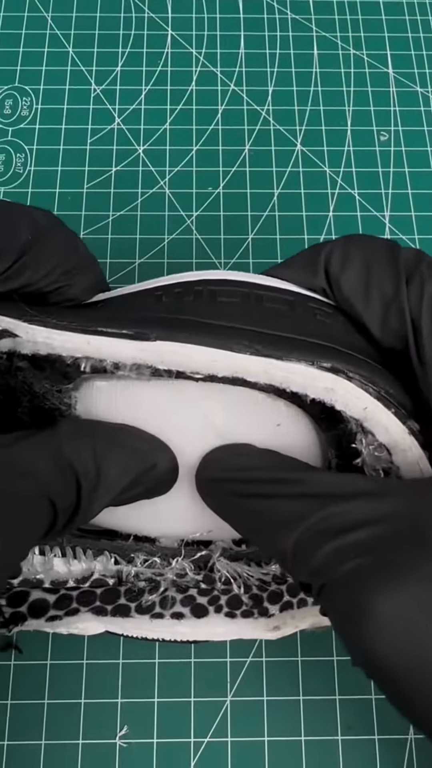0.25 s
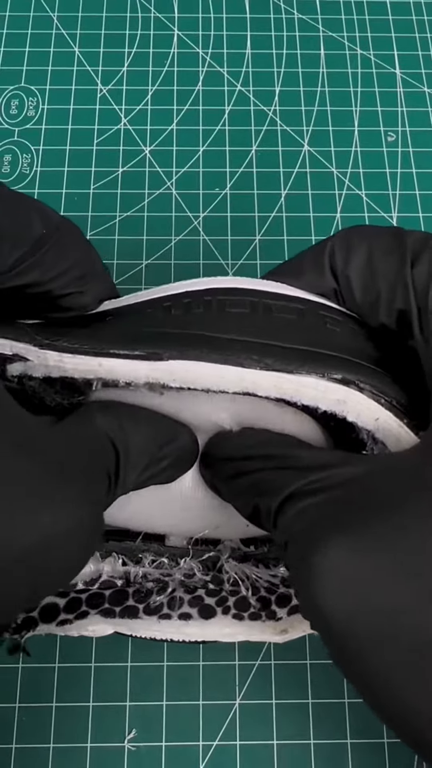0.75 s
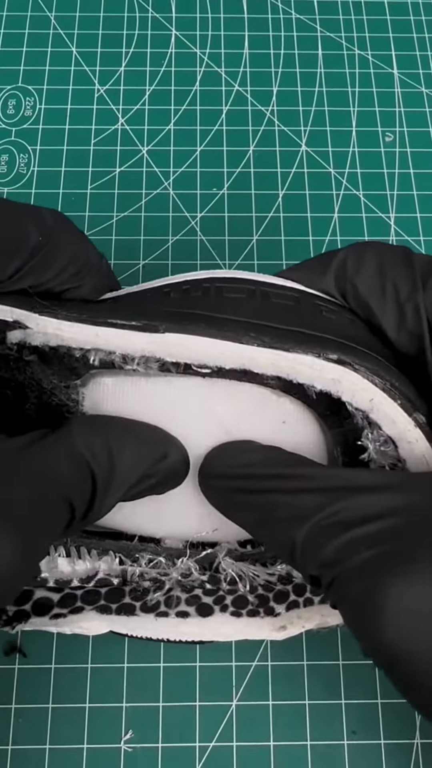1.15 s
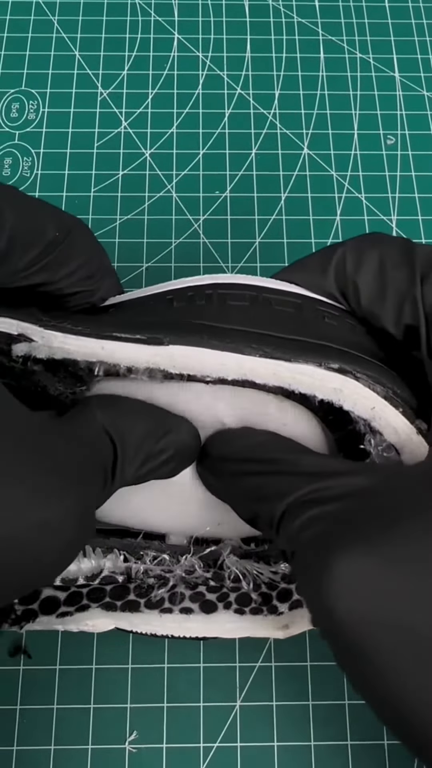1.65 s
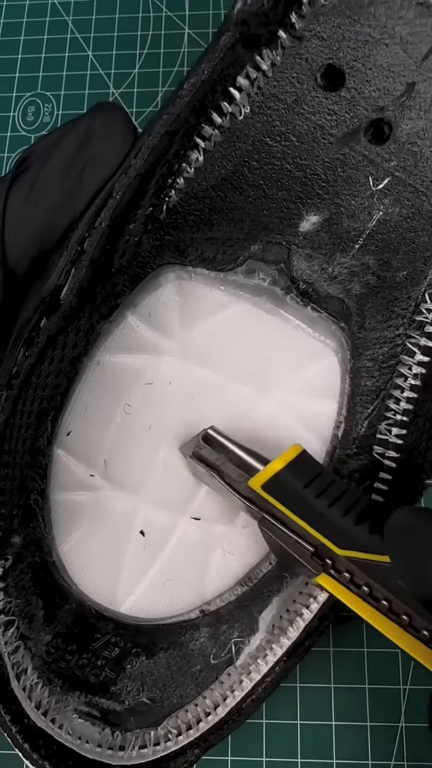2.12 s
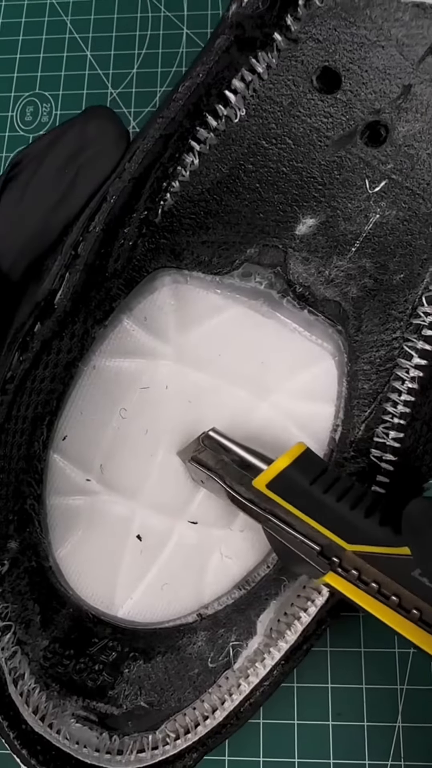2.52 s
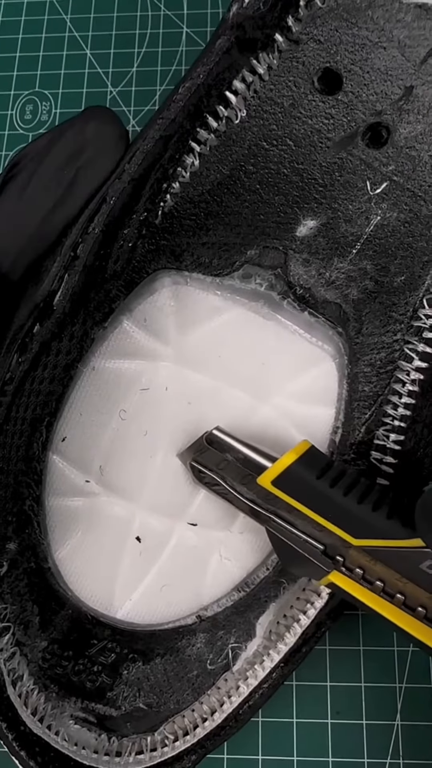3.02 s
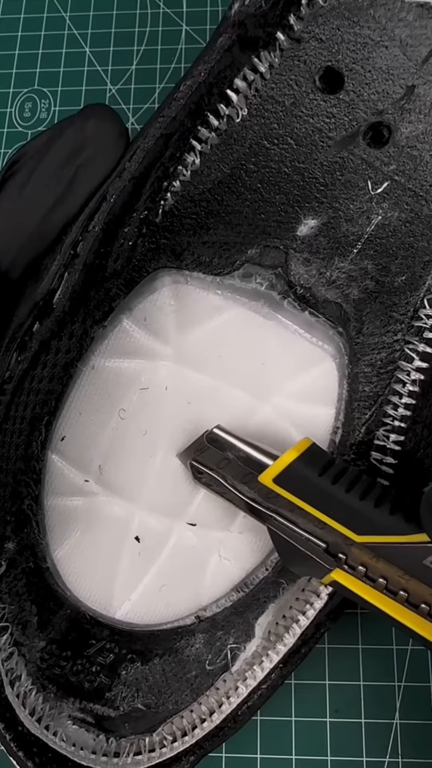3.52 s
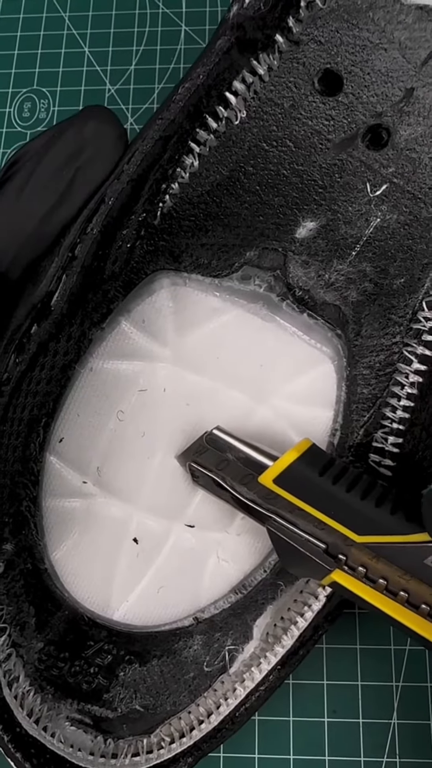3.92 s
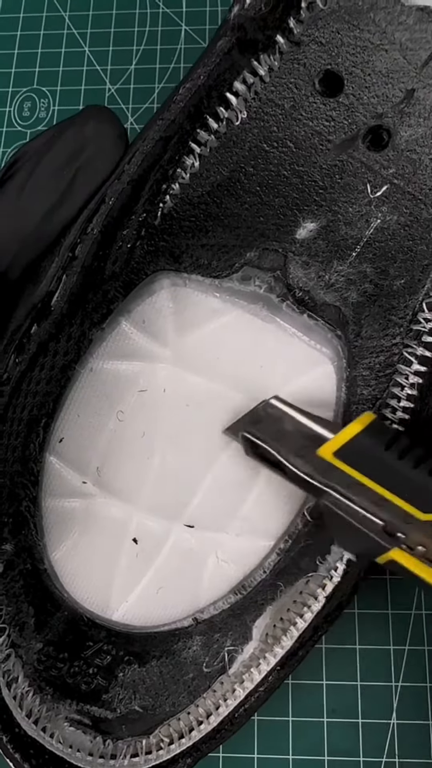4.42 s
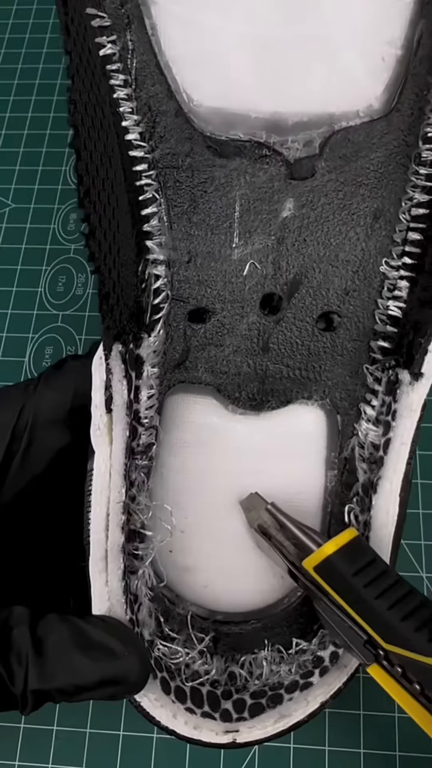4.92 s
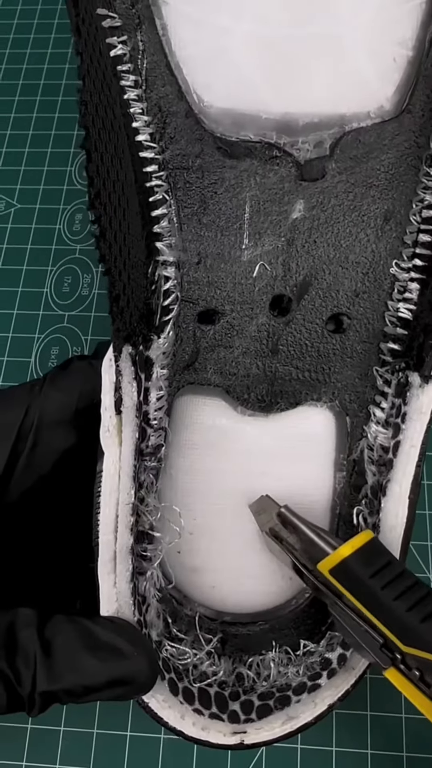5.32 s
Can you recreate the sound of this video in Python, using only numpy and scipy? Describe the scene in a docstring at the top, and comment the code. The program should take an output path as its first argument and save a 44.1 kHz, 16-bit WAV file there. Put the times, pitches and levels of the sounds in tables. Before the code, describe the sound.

Close and dry in a small dead room: gloved hands tug glued shoe layers apart in uneven crackling bursts with tiny ringing snaps and faint rustle. A knife then creaks and pops into foam, knocks the sole, and hisses with growing force until the foam rasps and rips. A hard click follows, a quiet gap, soft taps and another knock, and a second steadier hiss runs to the end.

```python
"""A craft knife pierces the foam insert of a sneaker and is drawn through it: cells burst in a swelling hiss.
The last foam rasps and rips as the blade tears free; the knife clicks on the sole and a second cut begins.
Before that, gloved hands pull the glued layers apart on a work table: stick-slip crackle, ringing snaps.
Bursts of noise make the hiss and cracks, short decaying tones the ringing, steady noise the rumble and air.
A close pair of microphone ports hears it in a small dead room."""
import sys
import numpy as np
from scipy import signal
from scipy.fft import rfft, irfft
from scipy.io import wavfile
from scipy.ndimage import uniform_filter1d

SR = 44100
rng = np.random.default_rng(int(sys.argv[2]) if len(sys.argv) > 2 else 0)


def transcribe(u):
    """Save the signal u as a 16-bit wav file named by the first command-line argument.

    u: samples, shape (n,) or (channels, n), limited to [-1, 1]; the rate is SR.
    q: integer samples, one column per channel.
    """
    v = np.clip(np.atleast_2d(u).T, -1, 1)
    q = np.round(v * 32767).astype(np.int16)
    wavfile.write(sys.argv[1], SR, q)


N = 244870
TIME = np.arange(N) / SR
FREQS = np.fft.rfftfreq(N, 1 / SR)
LEAD_S = .008  # a click's sound starts this long before its release

# colour of cracking glue: f/Hz, relative level/dB
GLUE_COLOUR = [(59, -58), (100, -18), (424, -16), (736, -9.5), (1390, -7.3), (2520, -2), (3320, -8),
               (4000, -6), (5200, -8.5), (6990, -6), (8000, -9), (9210, -19.5), (14100, -25), (16000, -34)]
# colour of the foam's skin under the blade: f/Hz, relative level/dB
SKIN_COLOUR = [(150, -25), (400, -29), (700, -25.5), (1300, -9.5), (1800, -19), (2200, 0), (2600, 1.5),
               (3200, -17), (3800, -6.5), (6300, -14), (7500, -9), (9500, -11.5), (12800, -22),
               (15500, -19)]
# colour of contacts with the sole: f/Hz, relative level/dB
CONTACT_COLOUR = [(200, -16), (600, -6.5), (850, -7), (1200, 0), (7000, -2), (9500, -17)]
# how alike the two ports hear the hands: f/Hz, likeness (0-1), lead of the first port/rad
AT_HANDS = [(62.4, 1, 0.07), (400, 0.5, -0.1), (950, .99, -.05), (2500, 1, -0.05), (3300, .7, 0.25),
            (4200, .9, .1), (8400, .15, -1)]
# how alike the two ports hear the blade: f/Hz, likeness (0-1), lead of the first port/rad
AT_BLADE = [(194, 0.86, 3), (600, 0.5, .4), (1050, 0.98, 0.2), (2300, 1, 0), (2550, .95, 0.4),
            (3210, 0.15, 2.2), (4400, 0.8, 2.7), (5460, .9, 0.5), (7800, 0.41, 1.36), (9300, .7, 2),
            (12200, 0.6, 0.5), (15400, 0.49, 2)]


def amp(db):
    """Turns decibels into a gain."""
    return 10 ** (np.asarray(db) / 20)


def evened(x):
    """Scales a signal to rms 1."""
    return x / np.sqrt(np.mean(x ** 2) + 1e-20)


def read(points, hz, axis=1):
    """Reads one column of a table along log frequency."""
    rows = np.array(points, float)
    return np.interp(np.log(hz + 1), np.log(rows[:, 0] + 1), rows[:, axis])


def follow(rows, axis=1):
    """Reads one column of a time curve at every sample."""
    rows = np.array(rows, float)
    return np.interp(TIME, rows[:, 0], rows[:, axis])


def level(rows):
    """Turns a level curve into a gain that is silent outside its span, with softened ends."""
    inside = 1. * (TIME >= rows[0][0]) * (TIME <= rows[-1][0])
    return amp(follow(rows)) * uniform_filter1d(inside, size=200)


def add(mix, s, sound):
    """Mixes a stereo sound in from time s, or from the very start if s is negative."""
    part = mix[:, max(round(s * SR), 0):][:, :sound.shape[1]]
    part += sound[:, :part.shape[1]]


def wander(hz):
    """Makes a slow random curve of rms 1 that changes at up to about the given rate."""
    noise = rfft(rng.standard_normal(N))
    return evened(irfft(noise / (1 + (FREQS / hz) ** 4), N))


def ports(pair, spectrum, place):
    """Colours two unrelated signals and blends them as two ports hear that place; their mean has rms 1."""
    size = pair.shape[1]
    hz = np.fft.rfftfreq(size, 1 / SR)
    a, b = rfft(pair) * amp(read(spectrum, hz))
    likeness = np.clip(read(place, hz), 0, 1)
    half_turn = np.exp(.5j * read(place, hz, axis=2))
    shared = a * np.sqrt(1 + likeness)
    apart = b * np.sqrt(1 - likeness)
    out = irfft(np.array([(shared + apart) * half_turn, (shared - apart) / half_turn]), size)
    return out / np.sqrt(np.mean(out.mean(0) ** 2))


def rupture_sizes(per_s, spread_db):
    """Scatters ruptures of uneven size at random moments."""
    sizes = amp(spread_db * np.minimum(rng.exponential(1, N), 3.5))
    return sizes * (rng.random(N) < per_s / SR)


def grains(per_s, spread_db, ring_s, wash):
    """Makes each tiny rupture a brief noise burst, over a steady wash of still smaller ones."""
    sizes = rupture_sizes(per_s, spread_db)
    power = signal.lfilter([1], [1, -np.exp(-2 / (ring_s * SR))], sizes ** 2)
    return np.sqrt(power / power.mean() + wash ** 2) * rng.standard_normal((2, N))


def pings(per_s, spread_db, cycles, count=24):
    """Lets each little crack ring its own patch of the shoe, low or high, for a few cycles."""
    sizes = rupture_sizes(per_s, spread_db)
    kicks = sizes * rng.standard_normal((2, N))
    patch = rng.integers(0, count, N)
    out = np.zeros((2, N))
    for k, hz in enumerate(np.geomspace(220, 14000, count)):
        turn = 2 * np.pi * hz / SR
        r = np.exp(-hz / (cycles * SR))
        out += signal.lfilter([1 - r, 0, r - 1], [1, -2 * r * np.cos(turn), r * r], kicks * (patch == k))
    return evened(out)


def brighten(x, treble_db, hz):
    """Splits a sound at hz: the low part gets rms 1, the high part its own level against it."""
    high = irfft(rfft(x) / (1 + (hz / (FREQS + 1)) ** 12), N)
    low = x - high
    return low / low.mean(0).std(), high / high.mean(0).std() * amp(treble_db)


def strain(start, end, level_db, ease_s):
    """Gives the gain of one effort: it builds up, holds from start to end, and eases off 20 dB in ease_s."""
    build_share = .7  # building up takes this share of the easing time
    away = np.maximum(start - TIME, 0) / build_share + np.maximum(TIME - end, 0)
    return amp(level_db - 20 * away / ease_s)


def shifting(x, patchy_db=3.7):
    """Changes the colour every few hundredths of a second, as the crack front moves on."""
    z = signal.stft(x, nperseg=512)[2]
    patches = rng.standard_normal(z.shape[1:])
    patches = uniform_filter1d(patches, size=4, axis=0)  # smooth over frequency
    patches = uniform_filter1d(patches, size=9, axis=1)  # smooth over time
    return evened(signal.istft(z * amp(patchy_db * evened(patches)))[1][:, :N])


def stick_slip():
    """Gives the gain of a grip that holds and lets go in a quick, uneven series."""
    slips_per_s, unevenness, stuck_db = 140, .5, -4
    turns = np.cumsum(slips_per_s * np.exp(unevenness * wander(slips_per_s))) / SR
    from_slip_s = abs(turns % 1 - .5) / slips_per_s
    return evened(amp(stuck_db) + np.exp(-2 * from_slip_s / .0016))


def resonate(x, hz, width_hz):
    """Passes a sound through a resonance whose pitch follows the curve hz."""
    turn = np.exp(2j * np.pi * np.cumsum(hz) / SR)
    r = np.exp(-np.pi * width_hz / SR)
    return (turn * signal.lfilter([1], [1, -2 * r, r * r], x / turn)).real


def crackle(rows, spectrum, place, trim_db, treble_db, per_s, spread_db, wash, ping_db):
    """Lets glue or foam go in clumps of fine cracks, one clump a slip, as loud as the strain is high."""
    cracks = evened(grains(per_s, spread_db, .0003, wash))
    cracks = cracks + amp(ping_db) * pings(4 * per_s, spread_db, cycles=2.2)
    clumps = shifting(cracks) * stick_slip()
    low, high = brighten(ports(clumps, spectrum, place), treble_db, 9000)
    return amp(trim_db) * sum(strain(start, end, level_db, ease_s) * (low + high * amp(bright_db))
                              for start, end, level_db, bright_db, ease_s in rows)


def click(modes, spectrum, place, shares_db, rise_s, burst_s, ring_db, tail_db, tail_s):
    """Builds cracks up to one release that rings the modes; as much energy as 5 ms at rms 1."""
    # upper edges of the low body, core and bright edge; the fizz lies above: f/Hz
    band_edges = (1800, 4000, 9000)
    skirt_db, skirt_s = -15, .0055  # faint noise that swells before the release and fades after it
    size = round(4 * LEAD_S * SR)
    t = np.arange(size) / SR - LEAD_S
    hz = np.fft.rfftfreq(size, 1 / SR)
    age = np.maximum(t, 0)
    build_up = np.exp(np.minimum(t, 0) / rise_s)

    skirt = amp(skirt_db) * np.exp(-abs(t) / skirt_s) * np.clip(1 + t / LEAD_S, 0, 1) ** .5
    release = build_up * (np.exp(-age / burst_s) + amp(tail_db) * np.exp(-age / tail_s))
    burst = (skirt + release) * rng.laplace(size=(2, size))
    ring = 0
    for f, width_hz, db in modes:
        tone = np.sin(2 * np.pi * (f * t + rng.random((2, 1))))
        ring = ring + amp(db) * evened(build_up * tone * np.exp(-np.pi * width_hz * age))
    heard = ports(evened(burst) + amp(ring_db) * ring, spectrum, place)

    # share the energy among low body, core, edge and fizz; the core takes what is left
    below = [0 * hz] + [1 / (1 + (hz / edge) ** 10) for edge in band_edges] + [1 + 0 * hz]
    parts = irfft(rfft(heard) * np.diff(below, axis=0)[:, None], size)
    body, edge, fizz = amp(np.minimum(shares_db, -1))
    core = np.sqrt(max(1 - body ** 2 - edge ** 2 - fizz ** 2, .1))
    sound = sum(g * part / np.linalg.norm(part.mean(0)) for g, part in zip((body, core, edge, fizz), parts))
    return sound * np.sqrt(.005 * SR)


def room(x, wet_db=-21, t60=.14, dull_hz=5000):
    """Adds a short, dull tail of fading noise for the table and walls."""
    t = TIME[:SR // 3]
    tail = rng.standard_normal((2, len(t))) * amp(-60 * t / t60) * (t > .003)
    tail = signal.lfilter(*signal.butter(1, dull_hz, fs=SR), tail)
    return x + amp(wet_db) * signal.fftconvolve(x, tail / np.linalg.norm(tail[0]), axes=1)[:, :N]


def room_tone(db=-64.7, drift_db=1.5):
    """Makes the faint air of the workroom from coloured noise that drifts a little in level."""
    # colour of the air: f/Hz, relative level/dB
    air_colour = [(20, -14.5), (74, -8), (168, -16), (700, -28), (1550, -27), (2050, -15.5), (2700, -23),
                  (4400, -19.5), (6000, -28), (9500, -41), (16000, -38)]
    # how alike the two ports hear the air: f/Hz, likeness (0-1), lead of the first port/rad
    in_room = [(60, 1, 0), (300, .2, 0), (700, .55, 3), (2000, 1, 0), (6000, .3, 0)]
    air = ports(rng.standard_normal((2, N)), air_colour, in_room)
    return amp(db + drift_db * wander(2.8)) * air


def handling(rest_db=-69, sway_db=2):
    """Makes a dull rumble of the hands that swells at each new hold, and soft bumps as fading sine tones."""
    # hands shifting their hold: start t/s, end t/s, level/dB, time to ease off by 20 dB t/s
    regrips = [(.73, .8, -61, .15), (1.05, 1.1, -60.5, .12), (1.51, 1.65, -59, .2)]
    # colour of the rumble: f/Hz, relative level/dB
    rumble_colour = [(20, -25), (40, -8), (58, 2), (80, -9.5), (115, -13.5), (220, -22), (600, -56)]
    # the sole bumping the table: t/s, peak level/dB, f/Hz, time to fade by 60 dB t/s
    bumps = [(2.436, -51, 302, 0.044), (2.449, -42.5, 116, 0.048), (4.902, -51, 115, 0.067)]
    gain = amp(rest_db + sway_db * wander(3)) + sum(strain(*row) for row in regrips)
    out = gain * ports(rng.standard_normal((2, N)), rumble_colour, AT_HANDS)
    t = TIME[:SR // 4]
    for s, peak_db, hz, t60 in bumps:
        bump = amp(peak_db - 60 * t / t60) * np.sin(2 * np.pi * hz * t)
        add(out, s, np.tile(bump, (2, 1)))
    return out


def rubbing(per_s=300, spread_db=3, wash=1.0, sway_db=1.4):
    """Rustles the gloves unevenly while they grip the shoe, and hisses where they slide."""
    # gloves gripping the shoe: start t/s, end t/s, level/dB, time to ease off by 20 dB t/s
    grip_span = (0, 1.6, -68.5, 2)
    # a glove sliding over the shoe: start t/s, end t/s, level/dB, time to ease off by 20 dB t/s
    slides = [(.385, .42, -61, .1), (.5, .59, -57, .15)]
    # colour of the sliding glove: f/Hz, relative level/dB
    glove_colour = [(500, -12), (2000, -2), (5800, -5), (7300, 4), (9000, -13), (11000, -9), (16000, -24)]
    rustle = shifting(grains(per_s, spread_db, .001, wash))
    grip = strain(*grip_span) * amp(sway_db * wander(10)) * ports(rustle, GLUE_COLOUR, AT_HANDS)
    return grip + sum(strain(*row) for row in slides) * ports(rustle, glove_colour, AT_HANDS)


def flexing(per_s=220, spread_db=2.5, wash=.4):
    """Creaks the bent sole in low, dull lumps whose resonance glides with the bend."""
    # bends of the sole: start t/s, end t/s, level/dB, first f/Hz, last f/Hz
    flexes = [(.45, .52, -60, 1100, 520), (1.305, 1.335, -57.5, 1150, 280), (1.372, 1.392, -57, 750, 620),
              (1.415, 1.48, -60, 420, 170)]
    ease_s, width_hz = .04, 420
    glide = []
    for start, end, _, first_hz, last_hz in flexes:
        glide += [(start, first_hz), (end, last_hz)]
    lumps = ports(grains(per_s, spread_db, .002, wash), GLUE_COLOUR, AT_HANDS)
    lumps = resonate(lumps, follow(glide), width_hz)
    lumps /= np.sqrt(uniform_filter1d(lumps.mean(0) ** 2, size=2000))  # even out the loudness
    return lumps * sum(strain(start, end, level_db, ease_s) for start, end, level_db, _, _ in flexes)


def taps():
    """Taps the knife's handle on the sole, whose rubber damps each soft contact at once."""
    # dull taps: t/s, level/dB
    tap_list = [(3.951, -55), (4.7816, -44), (4.8574, -47), (5.0262, -47.5), (5.2026, -40), (5.362, -49)]
    modes = [(1550, 600, 0)]  # f/Hz, width f/Hz, level/dB
    shares_db = (-2.8, -13, -30)  # low body, edge, fizz
    out = np.zeros((2, N))
    for s, level_db in tap_list:
        sound = click(modes, CONTACT_COLOUR, AT_BLADE, shares_db,
                      rise_s=.001, burst_s=.0013, ring_db=-4, tail_db=-16, tail_s=.008)
        add(out, s - LEAD_S, amp(level_db) * sound)
    return out


def knocks(low_db=2, high_db=0):
    """Knocks and catches the knife on the sole: each rings the knife and two modes of the spot it meets."""
    # knocks: t/s, level/dB, low body share level/dB, 4-9 kHz edge share level/dB,
    # low ring f/Hz, high ring f/Hz, width of both rings f/Hz
    knock_list = [(2.371, -32.5, -24, -16, 2720, 5650, 190), (2.4345, -37, -15, -12, 2280, 3650, 200),
                  (2.437, -33.3, -12, -4, 2900, 5800, 260), (4.495, -35, -12, -4, 2400, 6000, 600),
                  (4.499, -26.5, -17, -7, 2600, 3900, 600), (4.5145, -40, -11, -4, 2700, 3400, 400),
                  (4.9037, -26.5, -5.5, -7.5, 3350, 6550, 220), (4.924, -42, -9, -7, 2580, 7000, 500)]
    # ringing of the knife: f/Hz, width f/Hz, level/dB
    knife_modes = [(1190, 100, -19), (2530, 110, -9), (3300, 80, -17), (5790, 90, -19), (6560, 110, -18)]
    fizz_db = -17  # against the edge
    out = np.zeros((2, N))
    for s, level_db, body_db, edge_db, low_hz, high_hz, width_hz in knock_list:
        modes = knife_modes + [(low_hz, width_hz, low_db), (high_hz, width_hz, high_db)]
        shares_db = (body_db, edge_db, edge_db + fizz_db)
        sound = click(modes, CONTACT_COLOUR, AT_BLADE, shares_db,
                      rise_s=.0008, burst_s=.0016, ring_db=-3, tail_db=-14.5, tail_s=.0075)
        add(out, s - LEAD_S, amp(level_db) * sound)
    return out


def peeling():
    """Tugs the glued layers apart, so that the glue sticks, slips and crackles."""
    # tugs: start t/s, end t/s, level before the trim/dB, added treble level/dB, time to ease off by 20 dB t/s
    tugs = [(0, .12, -46.3, -13, .025), (.447, .475, -50, -19, .05), (.502, .53, -48.5, -7, .035),
            (.835, .877, -46, -10, .018), (.905, .965, -44.5, -10.5, .05), (1.235, 1.255, -58.5, -2, .06),
            (1.295, 1.33, -51, -23, .045), (1.39, 1.485, -45.5, -20, .045), (1.705, 1.82, -53, -17, .05),
            (1.745, 1.78, -46, -13, .04)]
    return crackle(tugs, GLUE_COLOUR, AT_HANDS, trim_db=-1.9, treble_db=1.3,
                   per_s=700, spread_db=3, wash=.7, ping_db=-1.5)


def snaps(glue_scatter=.17):
    """Snaps glue threads, each ringing its own patch of the sole, and foam skin, always at one spot."""
    # snaps: t/s, level/dB, brightness level/dB added to edge and fizz
    snap_list = [(.0076, -42, 0), (.0182, -41, -3), (.0254, -39, -2), (.0481, -42, -1), (.0672, -36.5, 3),
                 (.0895, -39.5, 3), (.1126, -44, 1), (.1222, -39.5, -2), (.228, -52, 1), (.447, -43.5, -3),
                 (.4937, -37.5, 3), (.501, -45, 3), (.6936, -54, -7), (.84, -43, 2), (.9079, -34, 2),
                 (.9234, -38, 2), (.9278, -38.5, -4), (.9397, -37.5, 0), (.95, -41.5, -6), (.9615, -39, 2),
                 (1.2927, -36, -2), (1.3687, -45, -1), (1.382, -38, 1), (1.3928, -39.5, 3),
                 (1.422, -44, -2), (1.4641, -42, -4), (1.49, -43, 1), (1.5412, -50, 5), (1.6957, -46, 3),
                 (1.7278, -43, 1), (1.7533, -35.5, 1), (1.7606, -40, 0), (1.7692, -37, 0),
                 (1.7824, -36.5, -4), (1.8347, -40, 0), (1.8424, -38.5, 2), (2.0368, -42, -4),
                 (2.0444, -36, 1), (2.0522, -37.5, -1), (2.0759, -36.5, -2), (2.0907, -34, 1),
                 (2.1135, -42, 0), (2.1215, -41, -2), (2.1349, -35.5, 1), (2.1622, -23.3, -3),
                 (2.181, -33.5, 3), (4.803, -50, 4), (4.818, -47.5, 5)]
    # ringing of the sole: f/Hz, width f/Hz, level/dB
    sole_modes = [(1340, 610, -8), (2460, 650, 0.5)]
    # low body, edge and fizz of a snap of middling brightness, in dB
    glue_shares, skin_shares = (-10.3, -5.8, -13.5), (-10.5, -9, -6.5)
    out = np.zeros((2, N))
    for (s, level_db, bright_db), patch in zip(snap_list, rng.uniform(-1, 1, len(snap_list))):
        if s > 2:  # from here on the foam skin snaps at the blade
            spectrum, place, shares, modes = SKIN_COLOUR, AT_BLADE, skin_shares, sole_modes
        else:
            spectrum, place, shares = GLUE_COLOUR, AT_HANDS, glue_shares
            modes = [(hz * np.exp(glue_scatter * patch), width, db) for hz, width, db in sole_modes]
        body_db, edge_db, fizz_db = shares
        sound = click(modes, spectrum, place, (body_db, edge_db + bright_db, fizz_db + bright_db),
                      rise_s=.0007, burst_s=.0007, ring_db=-7.5, tail_db=-15, tail_s=.004)
        add(out, s - LEAD_S, amp(level_db) * sound)
    return out


def piercing():
    """Creaks the blade through the foam's taut skin; later the shoe rustles, shifted for the next cut."""
    # pressing in: start t/s, end t/s, level before the trim/dB, added treble level/dB,
    # time to ease off by 20 dB t/s
    stab_rows = [(2.038, 2.15, -44.6, -6, .036)]
    # shifting the shoe: same columns
    shift_rows = [(4.775, 4.87, -57, -5, .18), (4.93, 5.03, -58.5, -16, .06)]
    stab = crackle(stab_rows, SKIN_COLOUR, AT_BLADE, trim_db=-.5, treble_db=2,
                   per_s=1600, spread_db=1.6, wash=.7, ping_db=-1)
    shift = crackle(shift_rows, CONTACT_COLOUR, AT_BLADE, trim_db=-3.5, treble_db=-2.5,
                    per_s=300, spread_db=1.5, wash=1.1, ping_db=-8)
    return stab + shift


def tearing(trim_db=1, per_s=900, spread_db=1.5, ring_s=.001, wash=.7):
    """Rasps the last of the foam apart; its last walls give way one by one, each with a short squawk."""
    # the rasp: start t/s, end t/s, level before the trim/dB, time to ease off by 20 dB t/s
    tear_span = (4.39, 4.448, -34.3, .06)
    # colour of torn foam: f/Hz, relative level/dB
    torn_colour = [(80, -13), (300, -14), (500, -11.5), (1400, -8), (1750, -12), (2000, 4), (2550, 3.5),
                   (3050, -4), (5000, -9.5), (7200, -5), (8800, -19), (15500, -16)]
    # walls giving way: t/s, level/dB, ring f/Hz
    rips = [(4.3745, -29, 2100), (4.4075, -33, 2420), (4.4155, -31.5, 2250), (4.4243, -30, 2380),
            (4.429, -32.5, 2150), (4.4445, -29, 2150), (4.449, -30.5, 2520), (4.472, -41.5, 2400)]
    width_hz, shares_db = 160, (-22, -13, -22)  # low body, edge, fizz
    rasp = shifting(grains(per_s, spread_db, ring_s, wash))
    out = amp(trim_db) * strain(*tear_span) * ports(rasp, torn_colour, AT_HANDS)
    for s, level_db, hz in rips:
        sound = click([(hz, width_hz, 0)], torn_colour, AT_HANDS, shares_db,
                      rise_s=.0015, burst_s=.0012, ring_db=5, tail_db=-15, tail_s=.004)
        add(out, s - LEAD_S, amp(level_db) * sound)
    return out


def cut(rows, colours, trim_db, treble_db, per_s=7000, spread_db=.5, flutter_db=.55, wash=1.1):
    """Bursts foam cells by the thousand; the colour moves between shallow and deep with the blade's depth."""
    # blade depth in the first cut: t/s, depth (0-1)
    depth_curve = [(2.5, 0.03), (3.3, 0.17), (3.93, 0.92), (4.3, 0.92), (4.42, 0.2)]
    # echoes off the mat: delay t/s, level/dB
    echoes = [(.0053, -6)]
    cells = grains(per_s, spread_db, .00025, wash) * amp(flutter_db * wander(50))
    cells = cells + sum(amp(db) * np.roll(cells, round(s * SR), axis=1) for s, db in echoes)
    shallow, deep = (ports(cells, colour, AT_BLADE) for colour in colours)
    depth = np.clip(follow(depth_curve), 0, 1)
    low, high = brighten((1 - depth) * shallow + depth * deep, treble_db, 11000)
    return amp(trim_db) * level(rows) * (low + high)


def first_cut():
    """Draws the blade in uneven strokes, loudest near the end; the colour grows uneven, hollow near 4 kHz."""
    # how hard the blade is drawn: t/s, hiss level before the trim/dB
    draw = [(2.45, -63), (2.63, -51.8), (2.86, -52.5), (2.92, -56.5), (3.28, -58), (3.76, -49), (3.79, -45),
            (3.83, -51), (3.94, -50), (3.96, -43), (4.17, -38), (4.21, -39), (4.36, -28), (4.39, -32),
            (4.47, -57)]
    # colour of a shallow slit: f/Hz, relative level/dB
    shallow_colour = [(300, -19.5), (1500, -27), (2100, -2.5), (3100, 6.5), (3900, 1.5), (7600, 0),
                      (12500, -2.5), (14200, 1.5), (15700, 3)]
    # colour of a deep slit: f/Hz, relative level/dB
    deep_colour = [(300, -44), (1500, -20.5), (2700, -5.5), (3300, 7), (3750, 3), (4150, -17), (4600, -12),
                   (5450, 3), (6300, -7), (7500, 9), (8800, -1), (9900, 5), (10800, -5), (12000, 4),
                   (13000, -1), (15700, 2)]
    return cut(draw, (shallow_colour, deep_colour), trim_db=-.7, treble_db=3.6)


def second_cut():
    """Draws the blade through the foam at the heel, with one colour throughout."""
    # how hard the blade is drawn: t/s, hiss level before the trim/dB
    draw = [(5.02, -66), (5.08, -45.5), (5.286, -48), (5.398, -40), (5.55, -40)]
    # colour of the foam at the heel: f/Hz, relative level/dB
    heel_colour = [(300, -17.5), (950, -39), (1350, -17), (2400, -4), (3300, 3), (4800, -4.5), (5600, 4),
                   (6900, -1), (7800, 6), (9500, 1), (13200, -3.5), (13900, 5.5), (15700, -0.5)]
    return cut(draw, (heel_colour, heel_colour), trim_db=-1.3, treble_db=2.5)


def scene():
    """Mixes the peeling, the stab and the two cuts on the table, with the room around them."""
    hands = peeling() + flexing() + rubbing()
    contacts = snaps() + knocks() + taps()
    blade = piercing() + first_cut() + second_cut() + tearing()
    return room(hands + contacts + blade) + handling() + room_tone()


def record(dry):
    """Dips the level for two brief instants, then filters away what lies above 16 kHz."""
    # brief dips: start t/s, end t/s
    dips = [(.883, .893), (4.707, 4.721)]
    dip_db = -24
    dipped = uniform_filter1d(sum(1. * (TIME > start) * (TIME < end) for start, end in dips), size=200)
    low_pass = signal.firwin(401, 16000, window=("kaiser", 8), fs=SR)
    return signal.oaconvolve(dry * amp(dip_db * dipped), low_pass[None], "same")


dry = scene()
out = record(dry)
transcribe(out)
```